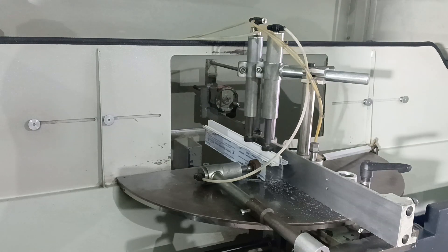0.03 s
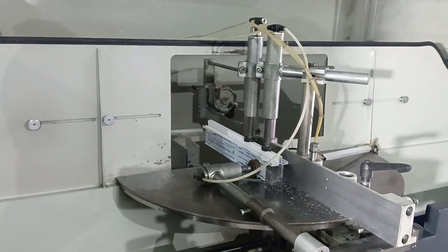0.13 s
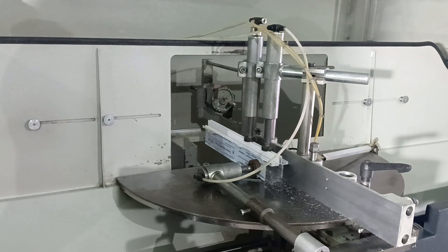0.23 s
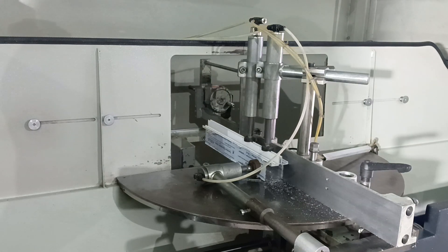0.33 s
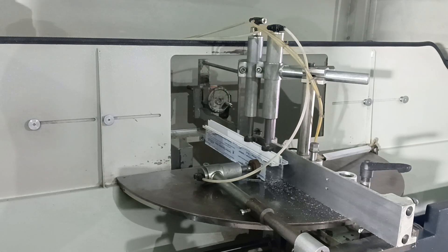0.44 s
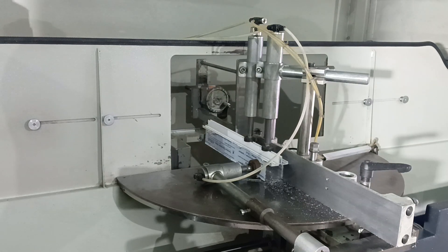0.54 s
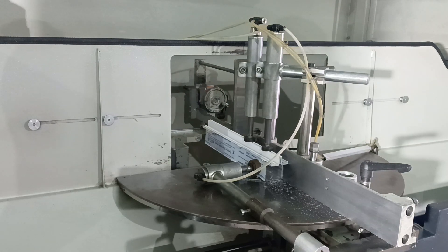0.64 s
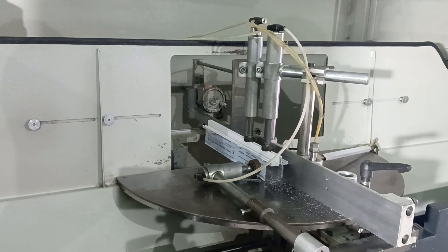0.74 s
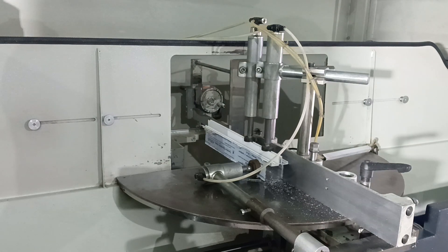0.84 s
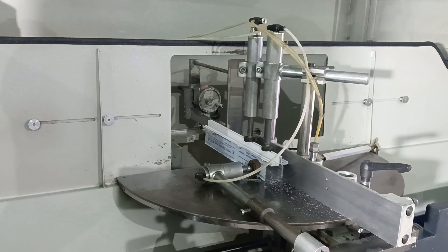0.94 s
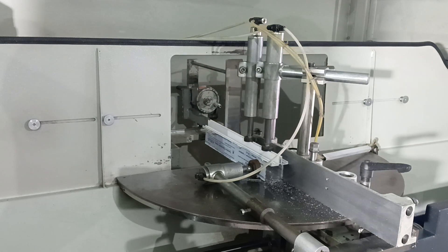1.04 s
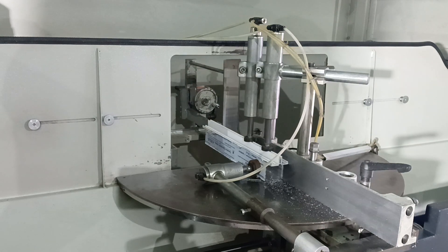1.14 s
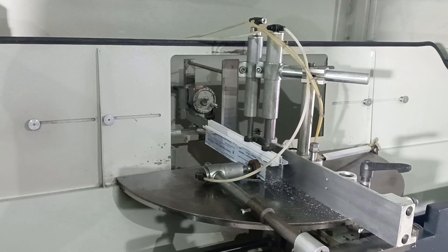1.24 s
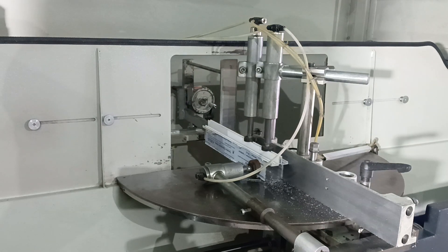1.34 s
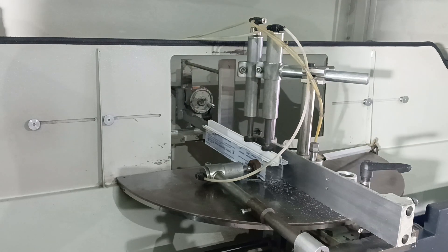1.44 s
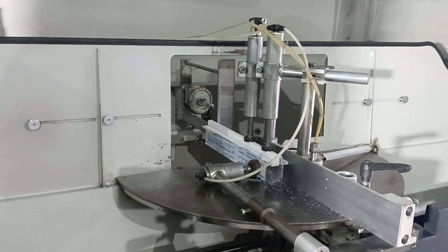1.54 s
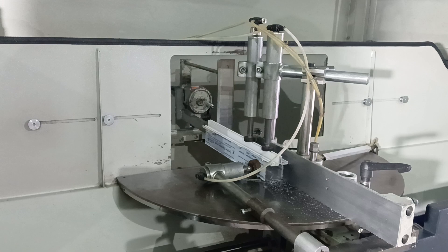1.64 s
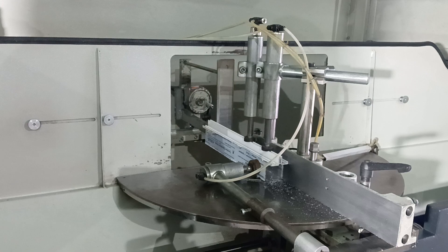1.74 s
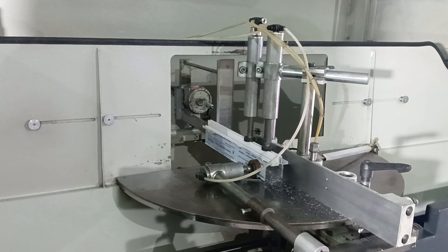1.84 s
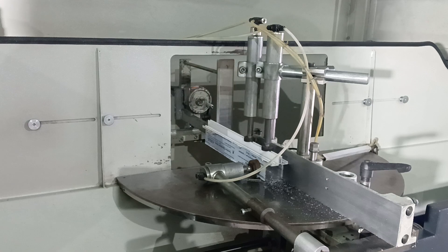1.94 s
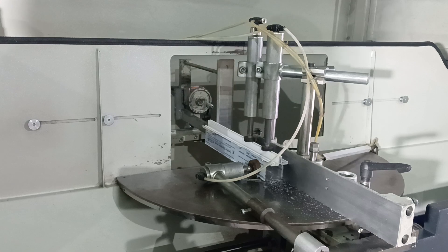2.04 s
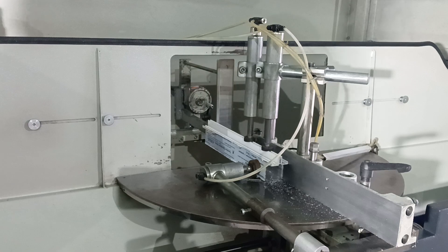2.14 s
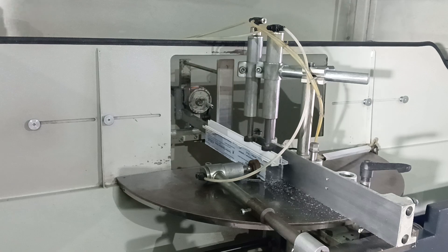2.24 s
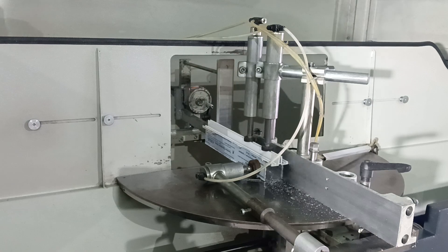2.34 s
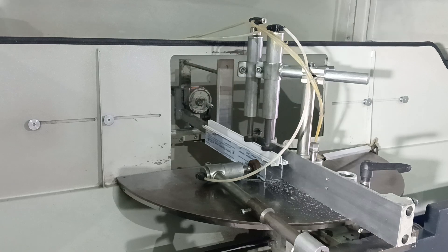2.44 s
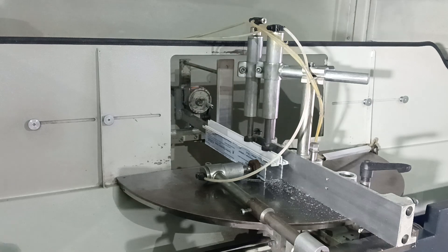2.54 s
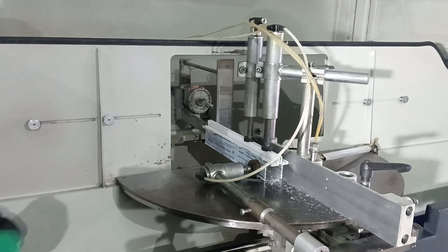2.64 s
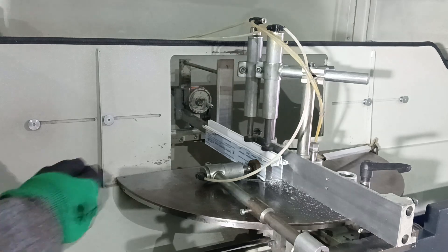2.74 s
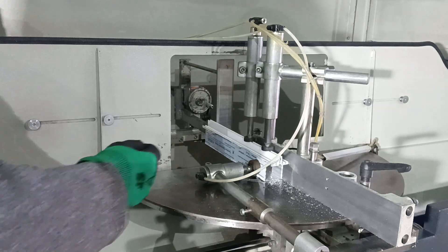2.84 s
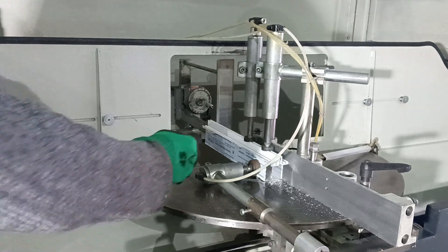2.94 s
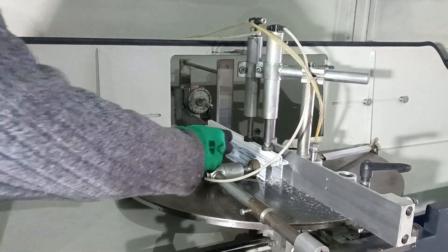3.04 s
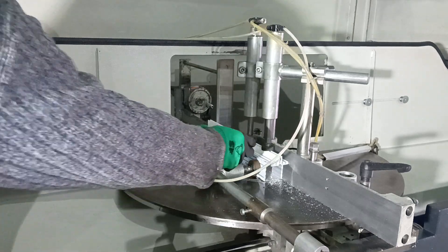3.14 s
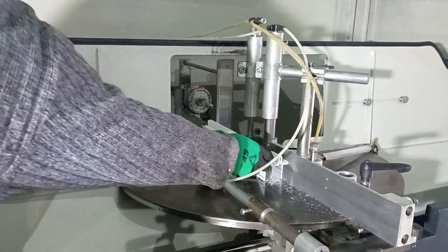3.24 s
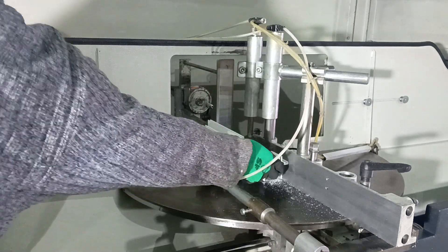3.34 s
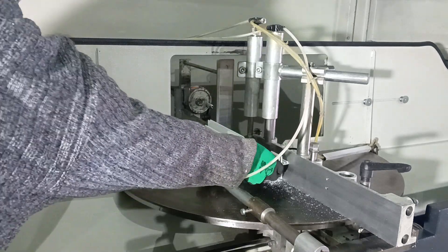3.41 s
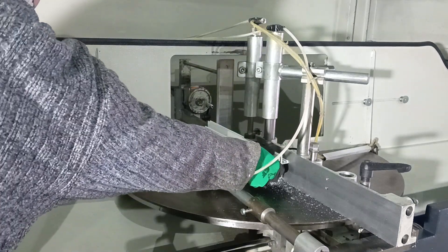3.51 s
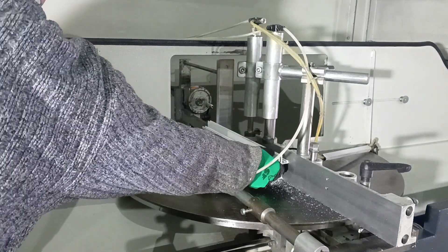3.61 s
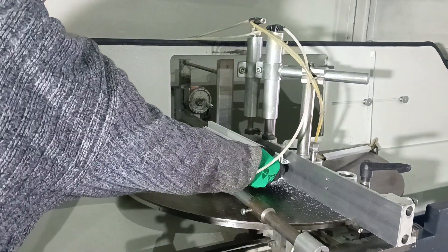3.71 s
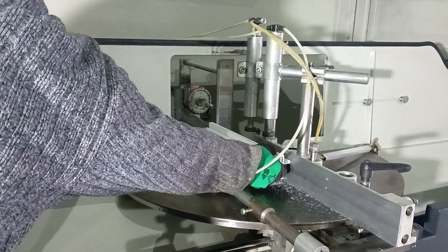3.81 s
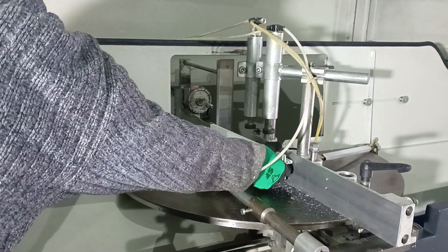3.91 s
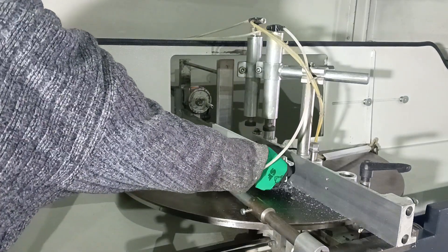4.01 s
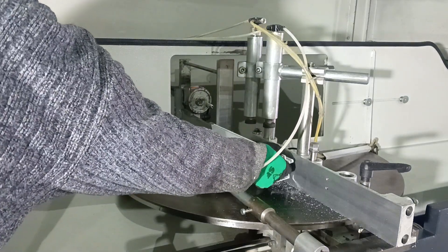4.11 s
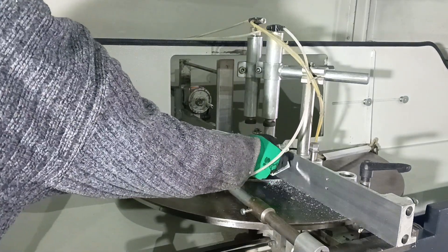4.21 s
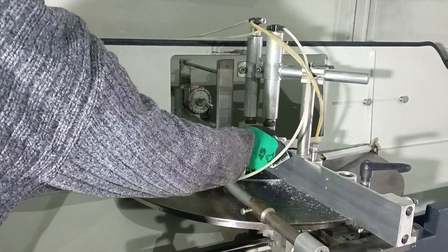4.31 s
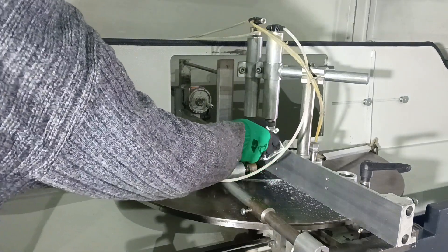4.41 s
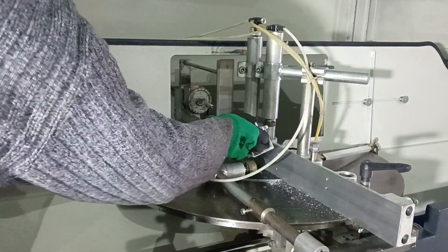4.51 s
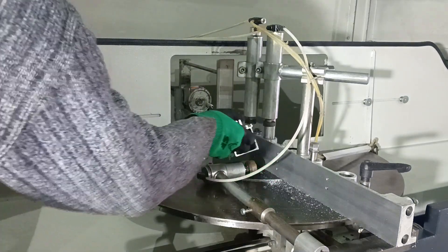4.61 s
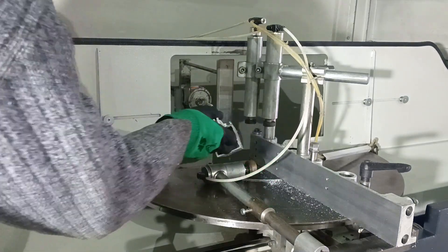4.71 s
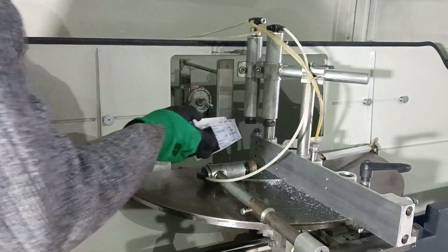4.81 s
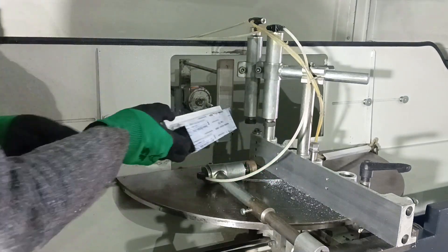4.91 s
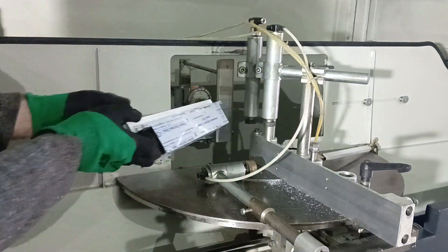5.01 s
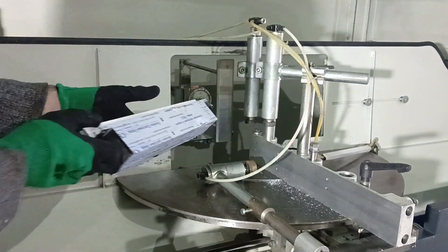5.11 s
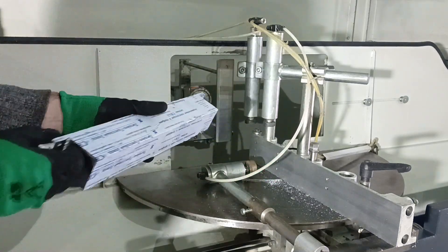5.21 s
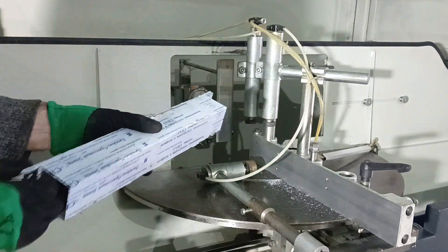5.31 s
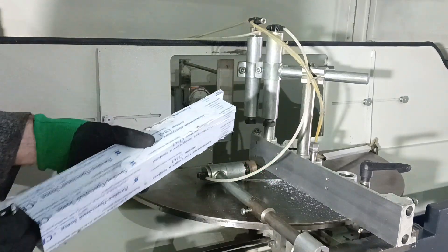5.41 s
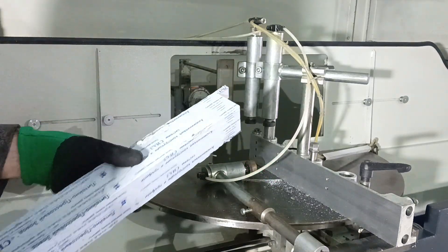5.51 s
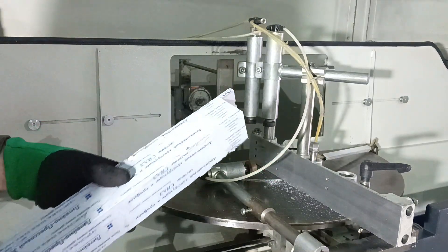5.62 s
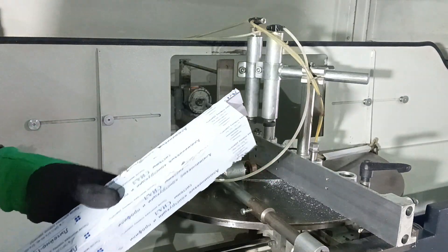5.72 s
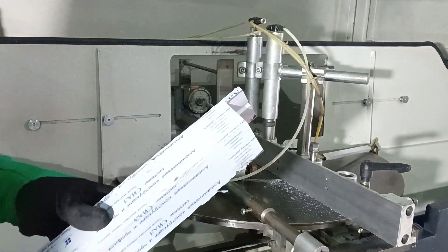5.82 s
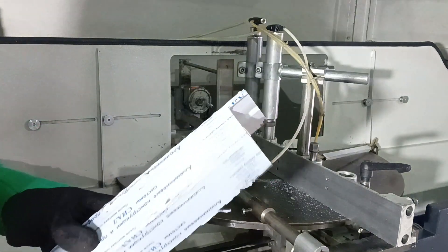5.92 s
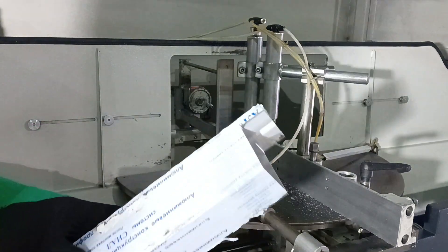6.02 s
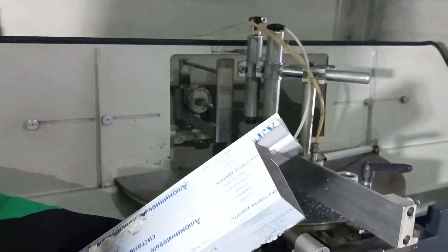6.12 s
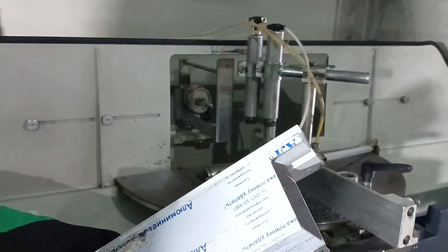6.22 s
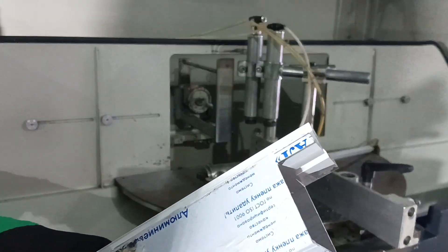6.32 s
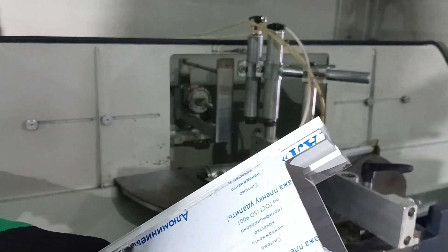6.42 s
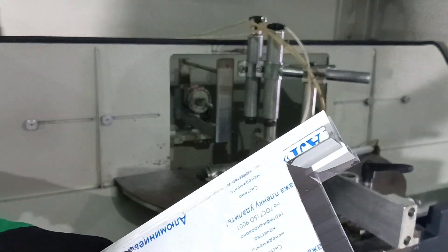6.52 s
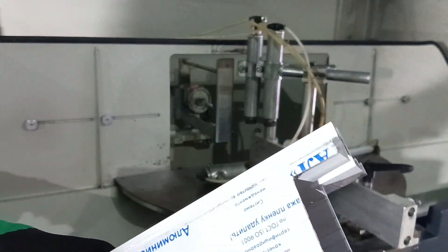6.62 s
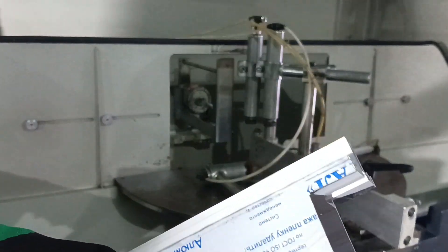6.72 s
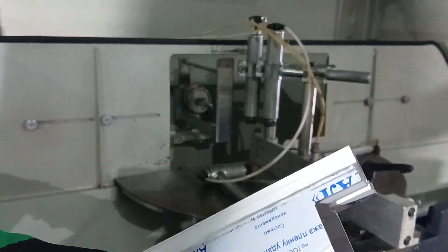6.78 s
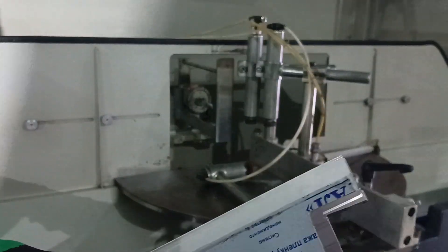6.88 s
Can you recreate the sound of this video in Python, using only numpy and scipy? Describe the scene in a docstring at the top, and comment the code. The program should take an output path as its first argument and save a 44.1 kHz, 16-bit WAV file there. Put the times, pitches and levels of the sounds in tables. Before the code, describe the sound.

Inside a steel machine cabinet, a large saw blade spins down after cutting aluminium. A loud, dense rush of churned air dominates, with a thin high whine gliding steadily lower. Near the middle a pneumatic clamp releases with a brief puff and a flurry of soft, dull knocks. The roar thins slightly as an arm reaches in, then weakens until a quick swell at the very end. Close, centred microphone.

```python
"""A large circular saw blade coasts down inside its steel cabinet after a cut in aluminium.
Its teeth churn the air into a loud rush (shaped noise) and a thin whine (two gliding sines),
both sinking with the speed. A pneumatic clamp lets go with a puff of noise and a few soft
knocks (decaying modes); an arm reaching in shades the roar, and late on the rush briefly swells."""
import sys
import numpy as np
from scipy import signal
from scipy.fft import rfft, irfft
from scipy.io import wavfile
from scipy.ndimage import uniform_filter1d

SR = 44100
rng = np.random.default_rng(int(sys.argv[2]) if len(sys.argv) > 2 else 0)


def unload_wav(signal):
    """Save mono or channel-first audio to the path in sys.argv[1] as 16-bit WAV at rate SR, clipped to [-1, 1]."""
    wavfile.write(
        sys.argv[1],
        SR,
        np.round(np.clip(np.atleast_2d(signal).T, -1, 1) * 32767).astype(np.int16),
    )


N = 306495

# Tooth-passing rate; the blade holds its speed, then coasts: (time [s], rate [Hz])
TOOTH_RATE = [(0.0, 5457), (0.48, 5458), (0.9, 5419), (1.2, 5390), (1.35, 5342), (1.7, 5238), (2.0, 5158),
              (2.7, 4980), (3.3, 4833), (4.0, 4652), (5.0, 4407), (6.0, 4173), (6.95, 3955)]
# Eddy spectrum at full speed, a hump that slides down with the blade:
# (frequency [Hz], relative density [dB per Hz])
EDDY_SPECTRUM = [(700, -40), (1300, -13), (1800, -4.5), (2250, 0.9), (2700, -1.7), (3100, -5), (3700, -9),
                 (4500, -14), (5500, -22.5), (8000, -30.5)]
# Roar of the cabinet at full speed: (frequency [Hz], relative density [dB per Hz])
ROAR_SPECTRUM = [(20, -48.5), (35, -36.3), (60, -26), (100, -17.5), (150, -7), (300, -3.5), (550, 0.0),
                 (750, -2.5), (1100, -0.2), (1700, -1.5), (2600, -32), (5000, -33)]
# Rim hiss at full speed: (frequency [Hz], relative density [dB per Hz])
HISS_SPECTRUM = [(2500, -26), (4200, -12), (5600, -11), (6900, -11), (7900, -8.5), (8650, -1.3),
                 (9200, 0.5), (9800, -7), (10800, -11), (12000, -15.6), (13000, -20), (15600, -15.5)]
# Peaks and dips that the cabinet lays on all the air noise:
# (centre [Hz], width at half height [Hz], height [dB])
CABINET_PEAKS = [(102, 11, 11.5), (146, 17, 6.5), (185, 18, 3.5), (216, 28, -1.5), (257.5, 31, 5.5),
                 (277, 20, -5), (318, 17, 6), (367, 6, 7), (423, 22, -10), (491.5, 52, 6.5), (601, 62, 4.5),
                 (745, 111, 0), (849.5, 31, 6.5), (997, 78, 2), (1100, 100, -0.5), (1829, 245, 0),
                 (2160, 58, -3), (2405, 99, -2), (2650, 630, 3.5), (3110, 610, 2.5), (3600, 150, -0.4),
                 (7400, 318, 1.2)]
# Strong standing waves of the cabinet; the whine swells as it sinks through each:
# (centre [Hz], width at half power [Hz], level of the whine before a common trim [dB])
STANDING_WAVES = [(5453, 15, -38), (5423, 12, -33), (5370, 34, -42), (5232, 32, -37), (5105, 45, -42),
                  (4998, 18, -42), (4846, 18, -44), (4780, 18, -43), (4690, 22, -40), (4626, 24, -42.5),
                  (4370, 38, -38.5), (4306, 32, -43.5), (4070, 60, -43), (3973, 24, -38.5)]
# Air let out of the clamp: (frequency [Hz], relative density [dB per Hz])
PUFF_SPECTRUM = [(400, -15), (1700, 4), (3000, -9), (4800, -8), (5900, -21), (7000, -2.5), (7900, -7),
                 (9000, 3), (10000, -10), (12000, -4.5), (15500, -13)]
# Blows of the clamp's piston as it draws back: (time [s], level [dB])
PISTON_KNOCKS = [(2.912, -26), (2.951, -25), (2.988, -32), (3.006, -28), (3.029, -28), (3.067, -31)]
# Modes of the clamp: (frequency [Hz], relative level [dB], decay time T60 [s])
CLAMP_MODES = [(154, -15, .09), (177, 4.5, 0.071), (226, -18, .06)]

TIME = np.arange(N) / SR
# frames and bins of the short-time spectrum
WINDOW, HOP = 4096, 1024
FRAME_S = np.arange(N // HOP + 5) * HOP / SR
BIN_HZ = np.fft.rfftfreq(WINDOW, 1 / SR)

# each air noise has a band level at full speed and grows as a power of the speed
ROAR_DB, ROAR_DB_PER_DOUBLING = -32, 16.0
EDDY_DB, EDDY_DB_PER_DOUBLING = -21, 19
HISS_DB, HISS_DB_PER_DOUBLING = -28.3, 31.5
HISS_FLOOR_DB = -43.5  # the part of the hiss that does not depend on the speed
# late on, the whole rush swells quickly and ebbs
SWELL_START_S, SWELL_RISE_S, SWELL_FADE_S = 6.72, 0.065, 0.25
SWELL_DB, SWELL_HISS_DB = 5.0, 4
# an arm across the cabinet's opening shades the low roar
ARM_IN_S, ARM_OUT_S = 3.12, 5.1  # moments of half cover
ARM_MOVE_S = 0.35  # time it takes to come or go
ARM_HZ, ARM_OCTAVES, ARM_DIP_DB = 285, 0.46, -3.5  # centre, width and depth of the dip
ARM_SHADE_DB = -0.5  # change at all frequencies, to which the dip adds
ECHO_T60_S = 0.77  # ring of the cabinet
PUFF_START_S = 2.919


def blade_air(slide=0.78, thinning_db=2.5, dulling_db=19.0, ripple_db=1.8, patchy_db=1.06, gust_db=0.53):
    """Turbulence noise: eddies shed by the teeth, rim hiss and cabinet roar, scaled by powers of speed."""
    speed = tooth_rate(FRAME_S)[:, None] / TOOTH_RATE[0][1]
    roar_level, eddy_level, hiss_level = air_levels(speed[:, 0])
    cabinet = cabinet_response(ripple_db)
    # slower teeth shed their eddies at a lower rate
    eddies = read(EDDY_SPECTRUM, BIN_HZ / speed ** slide)
    # as the blade slows, the roar loses bass and the hiss its top: dB an octave times lost speed
    octaves_below_500 = np.log2(np.clip(BIN_HZ / 500, 0.35, 1))
    roar = read(ROAR_SPECTRUM, BIN_HZ) + thinning_db * (1 - speed) * octaves_below_500
    octaves_above_9000 = np.log2(np.maximum(BIN_HZ / 9000, 1))
    hiss = read(HISS_SPECTRUM, BIN_HZ) - dulling_db * (1 - speed) * octaves_above_9000
    power = band_power(eddies + cabinet, eddy_level, (1400, 3800))
    power += band_power(roar + cabinet, roar_level, (250, 1200))
    power += band_power(hiss + cabinet, hiss_level, (5800, 15500))
    # the flow is uneven: drifting patches, and quick gusts shared by all bands
    patches = uniform_filter1d(rng.standard_normal(power.shape), size=4, axis=0)
    patches = evened(uniform_filter1d(patches, size=40, axis=1))
    white = rng.standard_normal(power.shape) + 1j * rng.standard_normal(power.shape)
    spectra = white * np.sqrt(power) * gain_of(patchy_db * patches + arm_shadow())
    air = signal.istft(spectra.T, nperseg=WINDOW, noverlap=WINDOW - HOP)[1][:N]
    overall_rms = np.sqrt(power.sum(1).mean())
    return overall_rms * evened(air) * gain_of(gust_db * wander(36))


def air_levels(speed):
    """Power-law scaling of flow noise: levels in dB of roar, eddies and hiss (speed 1 = full)."""
    doublings = np.log2(speed)
    roar = ROAR_DB + ROAR_DB_PER_DOUBLING * doublings
    eddies = EDDY_DB + EDDY_DB_PER_DOUBLING * doublings
    moving_hiss = gain_of(HISS_DB + HISS_DB_PER_DOUBLING * doublings)
    hiss = 20 * np.log10(np.hypot(moving_hiss, gain_of(HISS_FLOOR_DB)))
    rise = swell()
    return roar + SWELL_DB * rise, eddies + SWELL_DB * rise, hiss + SWELL_HISS_DB * rise


def swell():
    """Envelope of linear rise and exponential fall, 0-1, frame by frame."""
    t = FRAME_S - SWELL_START_S
    return np.clip(t / SWELL_RISE_S, 0, 1) * np.exp(-np.maximum(t - SWELL_RISE_S, 0) / SWELL_FADE_S)


def cabinet_response(ripple_db):
    """Resonance of an enclosure: separate peaks and dips, then crowded modes, in dB by bin."""
    peaks = sum(db * 2 ** -((2 * (BIN_HZ - hz) / width) ** 2) for hz, width, db in CABINET_PEAKS)
    # in the middle range the standing waves crowd into a fine steady ripple; higher up they blur
    ripple = evened(uniform_filter1d(rng.standard_normal(len(BIN_HZ)), size=3))
    ripple_weight = np.interp(BIN_HZ, [500, 1500, 3000, 7000], [0, 0.76, 0.61, 0.0])
    return peaks + ripple_db * ripple * ripple_weight


def arm_shadow():
    """Acoustic shadowing by an obstacle: level change in dB by frame and bin."""
    inside_s = np.minimum(FRAME_S - ARM_IN_S, ARM_OUT_S - FRAME_S)
    cover = np.clip(0.5 + inside_s / ARM_MOVE_S, 0, 1)[:, None]
    octaves_off = np.log2((BIN_HZ + 1) / ARM_HZ)
    dip = 2 ** -((2 * octaves_off / ARM_OCTAVES) ** 2)
    return cover * (ARM_SHADE_DB + ARM_DIP_DB * dip)


def tooth_whine(direct_db=-53.5, echo_db=-48.5, echo_db_per_doubling=8.0, standing_db=-1.0,
                octave_db=-57.0, octave_echo_db=-47.5, octave_colour=0.62,
                waver_hz=0.85, flutter_db=2.5):
    """Periodic forcing: each tooth pushes the air once, giving a tone and its octave in the cabinet."""
    rate = tooth_rate(TIME)
    cycles = np.cumsum(rate + waver_hz * wander(15.0)) / SR
    # resonance raises the tone's power as it crosses each standing wave
    standing_power = sum(gain_of(db + standing_db) ** 2 * 2 ** -((2 * (rate - hz) / width) ** 2)
                         for hz, width, db in STANDING_WAVES)
    doublings = np.log2(rate / TOOTH_RATE[0][1])
    echo = cabinet_echo(cycles) * gain_of(echo_db + echo_db_per_doubling * doublings)
    first = np.sqrt(gain_of(direct_db) ** 2 + standing_power + echo ** 2)
    # the octave is strongest where it crosses the peak of the rim hiss
    octave = np.hypot(gain_of(octave_db), gain_of(octave_echo_db) * cabinet_echo(2 * cycles))
    octave *= gain_of(octave_colour * read(HISS_SPECTRUM, 2 * rate))
    whine = first * np.sin(2 * np.pi * cycles) + octave * np.sin(2 * np.pi * 2 * cycles)
    return np.sqrt(2) * whine * gain_of(flutter_db * wander(43))  # levels are rms, hence sqrt(2)


def tooth_rate(t):
    """Kinematics of the coasting blade: tooth-passing rate in Hz at the times t."""
    s, hz = np.transpose(TOOTH_RATE)
    return np.interp(t, s, hz)


def cabinet_echo(cycles):
    """Reverberant interference: a gliding tone beats with its dense echoes; strength about 1."""
    t = np.arange(SR // 2) / SR
    tail = rng.standard_normal(len(t)) * np.exp(-np.log(1000) * t / ECHO_T60_S)
    tone = np.exp(2j * np.pi * cycles)
    return abs(signal.fftconvolve(tone, tail / np.linalg.norm(tail))[:N])


def clamp_puff(db=-25.5, rise_s=0.0068, blow_s=0.041, dying_s=0.041):
    """Jet noise: the valve opens, blows for a moment and dies away as the cylinder empties."""
    t = TIME - PUFF_START_S
    flow = np.clip(t / rise_s, 0, 1) * np.exp(-np.maximum(t - blow_s, 0) / dying_s)
    colour = gain_of(read(PUFF_SPECTRUM, np.fft.rfftfreq(N, 1 / SR)))
    hiss = evened(irfft(rfft(rng.standard_normal(N)) * colour, N))
    return gain_of(db) * flow * hiss


def clamp_knocks(rise_s=0.0053):
    """Modal excitation: soft blows of the piston ring the low modes of the clamp and table."""
    out = np.zeros(N)
    t = np.arange(SR // 2) / SR
    ring = sum(gain_of(db) * np.exp(-np.log(1000) * t / t60) * np.sin(2 * np.pi * hz * t)
               for hz, db, t60 in CLAMP_MODES)
    ring *= 1 - np.exp(-(t / rise_s) ** 2)  # the air cushion softens each blow
    for s, db in PISTON_KNOCKS:
        start = round(s * SR)
        out[start:start + len(t)] += gain_of(db) * ring
    return out


def gain_of(db):
    """Logarithmic level: decibels to amplitude."""
    return 10 ** (np.asarray(db) / 20)


def evened(x):
    """Normalisation to an rms of 1."""
    return x / np.sqrt(np.mean(x ** 2) + 1e-20)


def read(points, hz):
    """Spectral interpolation: a curve in dB, joined on a log-frequency axis."""
    f, db = np.transpose(points)
    return np.interp(np.log(hz + 1), np.log(f + 1), db)


def wander(rate_hz):
    """Low-pass noise of rms 1: random drift that thins out above about rate_hz."""
    hz = np.fft.rfftfreq(N, 1 / SR)
    return evened(irfft(rfft(rng.standard_normal(N)) * np.exp(-(hz / rate_hz) ** 2), N))


def band_power(shape_db, level_db, band):
    """Power summation: spectral power by frame and bin, with the given level inside the band in Hz."""
    power = np.atleast_2d(gain_of(shape_db) ** 2)
    inside = (BIN_HZ > band[0]) & (BIN_HZ < band[1])
    return power / power[:, inside].sum(1, keepdims=True) * gain_of(level_db)[:, None] ** 2


def scene():
    """Superposition: the machine stands straight ahead, the same in both channels."""
    machine = blade_air() + tooth_whine() + clamp_puff() + clamp_knocks()
    return np.array([machine, machine])


def record(dry):
    """Band limiting: the microphone loses the lowest bass, then a steep low-pass cuts the top."""
    highpass = signal.butter(4, 42, "highpass", fs=SR, output="sos")
    lowpass = signal.firwin(1023, 15780, window=("kaiser", 9), fs=SR)
    return signal.oaconvolve(signal.sosfilt(highpass, dry), lowpass[None], "same", axes=1)


dry = scene()
out = record(dry)
unload_wav(out)
```